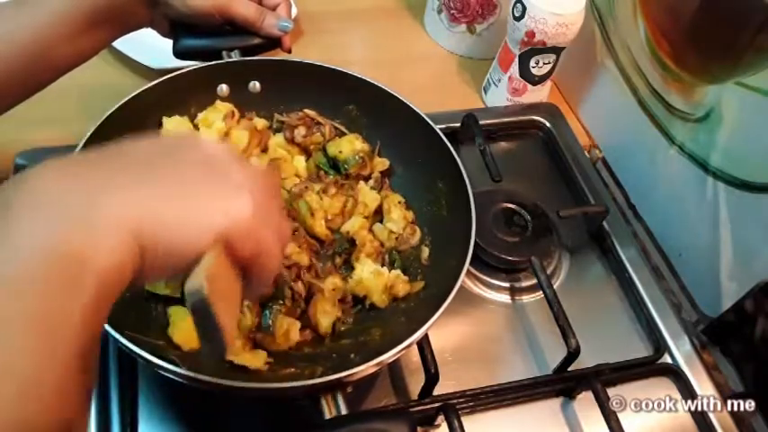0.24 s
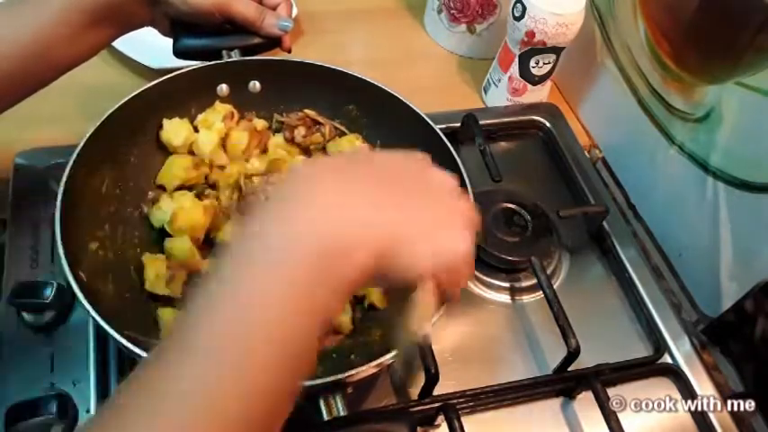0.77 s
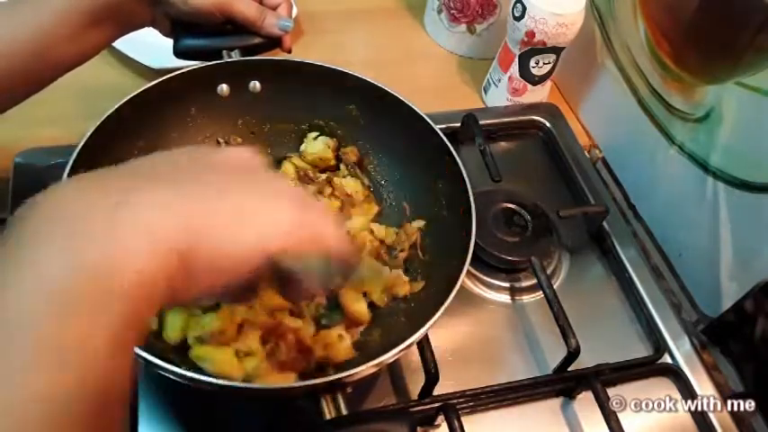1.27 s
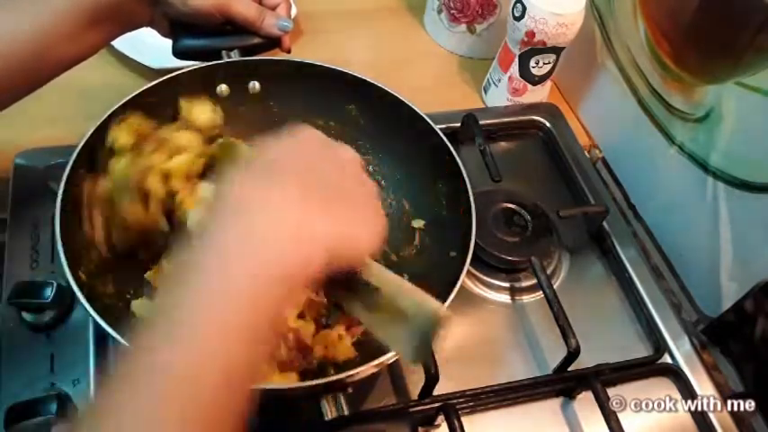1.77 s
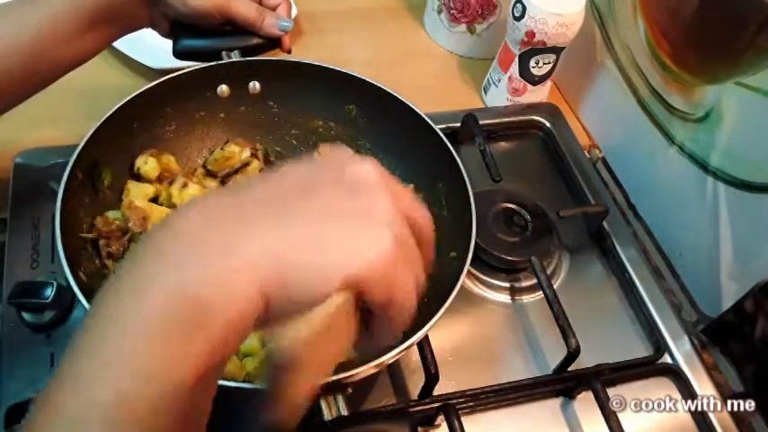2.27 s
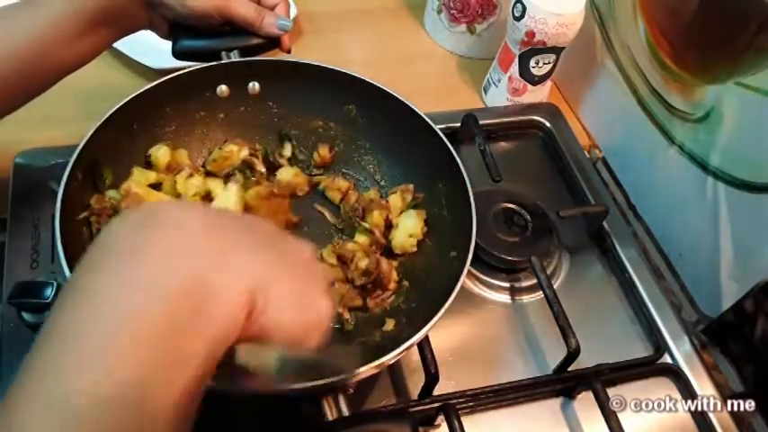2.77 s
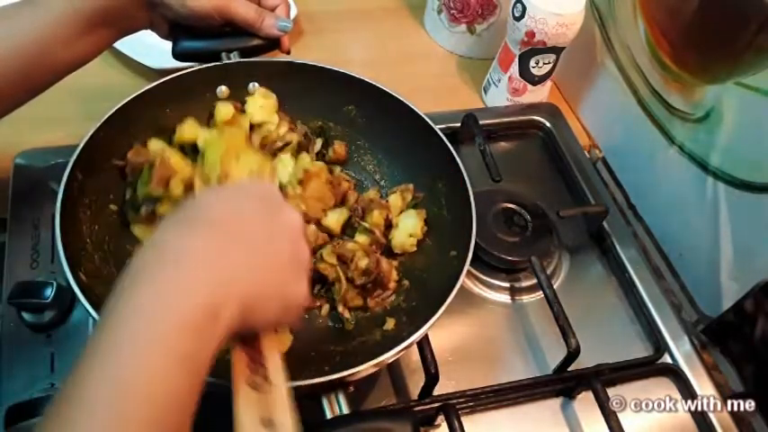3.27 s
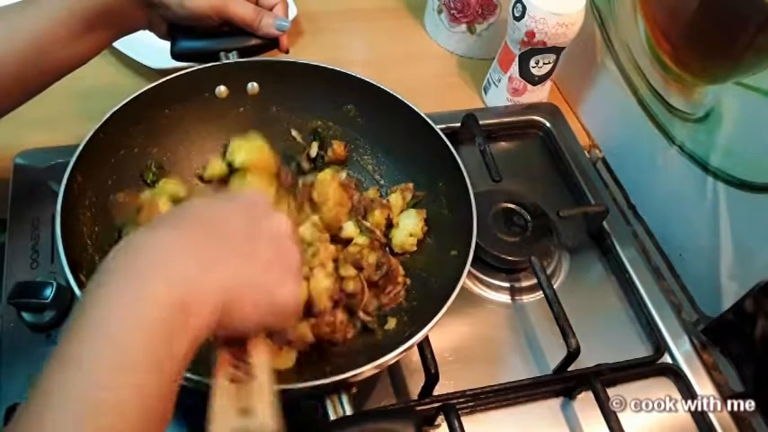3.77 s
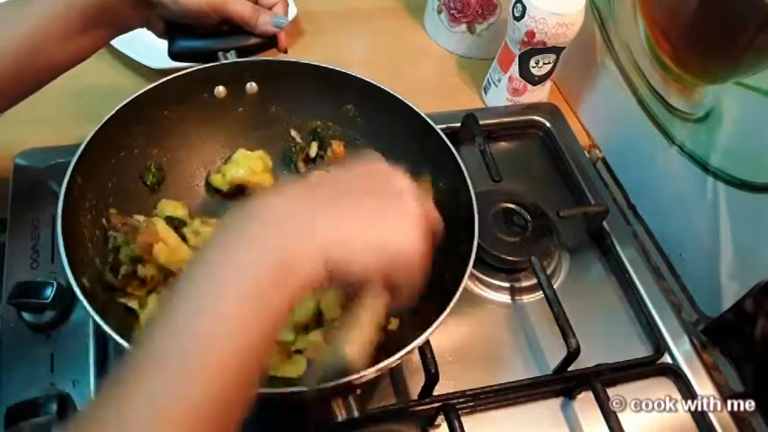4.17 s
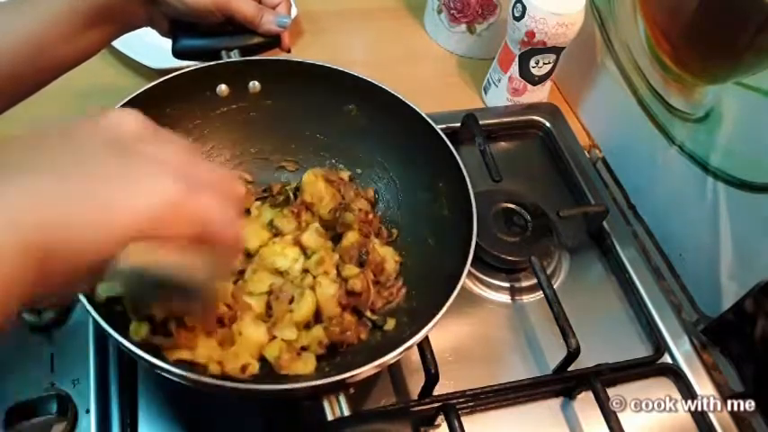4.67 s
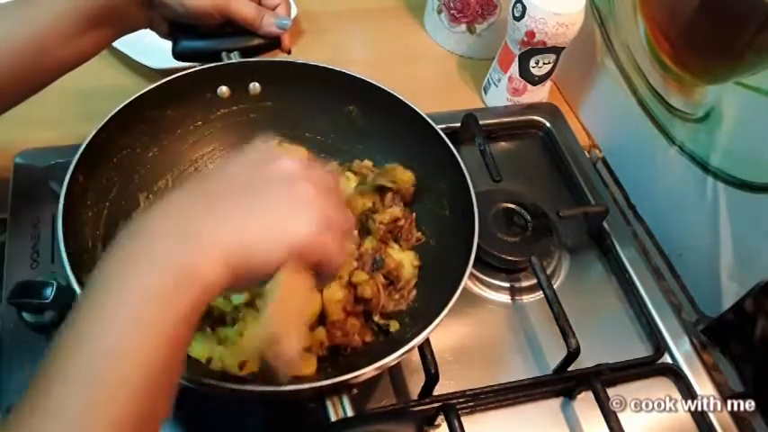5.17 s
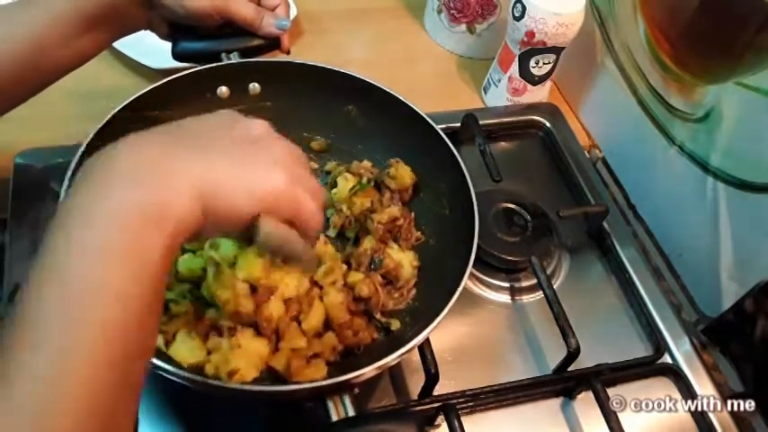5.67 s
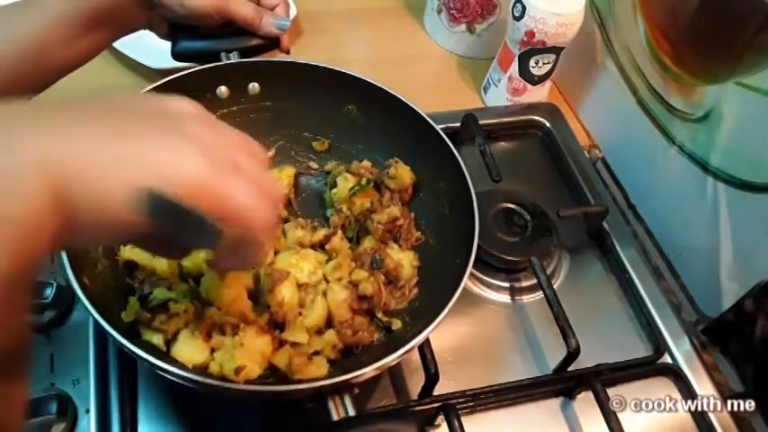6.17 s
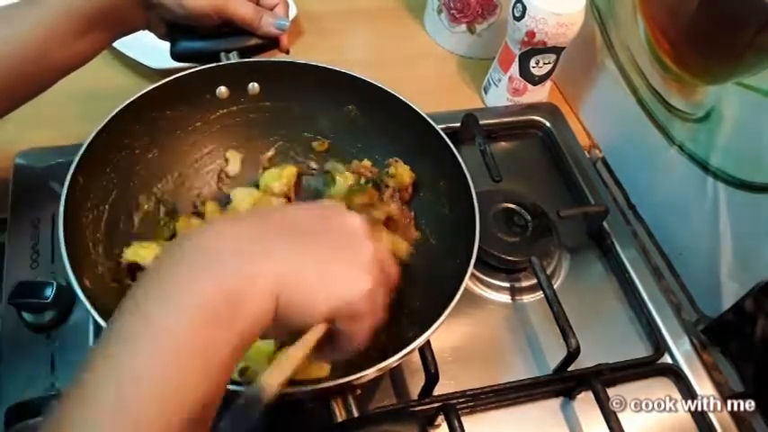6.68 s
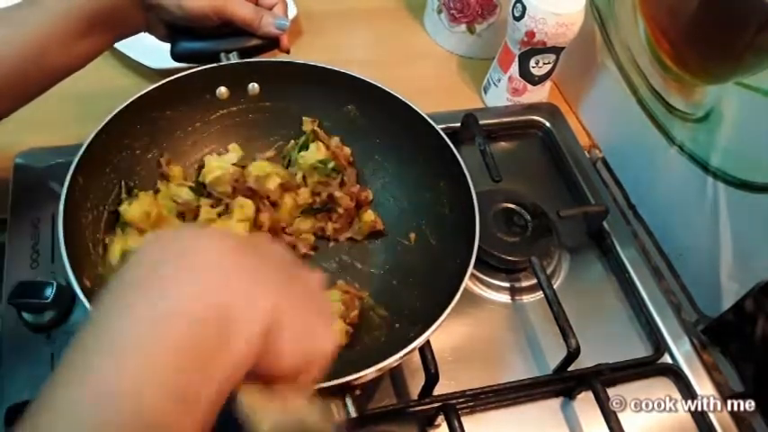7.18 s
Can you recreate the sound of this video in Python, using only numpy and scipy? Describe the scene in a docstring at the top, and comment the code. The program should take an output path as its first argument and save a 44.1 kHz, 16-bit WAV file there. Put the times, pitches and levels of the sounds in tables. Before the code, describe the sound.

Close above a pan in a small kitchen, a bright frying sizzle with sharp little spits runs over the faint rumble of a gas ring. A wooden spatula rasps through the moist food, busiest at first, each stroke raising a wet hiss. It knocks now and then on the pan's base and rim, hardest late on with a short metallic ring. The sizzle sinks for a moment, then swells with more scraping.

```python
"""Oil sizzles and spits, heard from just above a non-stick pan of potato and onion in a small kitchen.
Steam bubbles and drops of water burst in the oil, and the sizzle flares as moist food is turned.
A wooden spatula scrapes through it, sticking and slipping, knocks dully on the pan's base and clacks
against its rim. Underneath runs the low rumble of the gas stove."""
import sys
import numpy as np
from scipy import signal
from scipy.fft import rfft, irfft
from scipy.io import wavfile

SR = 44100
rng = np.random.default_rng(int(sys.argv[2]) if len(sys.argv) > 2 else 0)


def transcribe(signal):
    """Save signal, clipped to [-1, 1], as a 16-bit WAV file at the path in sys.argv[1]."""
    frames = np.atleast_2d(signal).T
    limited = np.clip(frames, -1, 1)
    pcm = np.round(limited * 32767).astype(np.int16)
    wavfile.write(sys.argv[1], SR, pcm)


N = 328104
TIME = np.arange(N) / SR
BLOW_TIME = TIME[:SR * 3 // 4]   # long enough for a knock to die away


def from_db(db):
    """Decibels to gain."""
    return 10 ** (np.asarray(db) / 20)


def unit_rms(x):
    """Scale to unit rms."""
    return x / np.sqrt(np.mean(x ** 2) + 1e-20)


def unit_attack(x):
    """Scale a blow to unit rms over its first 20 ms."""
    return x / np.sqrt(np.mean(x[:SR // 50] ** 2) + 1e-20)


def over_time(points):
    """Join (time_s, value) points into a curve across the scene."""
    return np.interp(TIME, *np.transpose(points))


def at_hz(points, hz):
    """Read (freq_hz, value) points on a log-frequency axis."""
    freq_hz, value = np.transpose(points)
    return np.interp(np.log(hz + 1), np.log(freq_hz), value)


def add(out, start_s, sound):
    """Mix a sound in from start_s."""
    start = max(round(start_s * SR), 0)
    out[start:start + len(sound)] += sound[:N - start]


def drift(per_s, size=N):
    """A random wander of unit rms that turns per_s times a second."""
    knots = rng.standard_normal(4000)
    return unit_rms(np.interp(TIME[:size] * per_s, np.arange(len(knots)), knots))


def coloured(x, spectrum, size=4096):
    """Causal (minimum-phase) filter with the given spectrum."""
    bin_hz = np.arange(size // 2 + 1) * SR / size
    cepstrum = irfft(np.log(from_db(at_hz(spectrum, bin_hz))))
    cepstrum[1:size // 2] *= 2
    cepstrum[size // 2 + 1:] = 0
    impulse = irfft(np.exp(rfft(cepstrum)))[:size // 2]
    return signal.fftconvolve(x, impulse)[:len(x)]


def resonance(x, hz, width_hz, block=64):
    """A band-pass whose centre follows hz, block by block."""
    radius = np.exp(-np.pi * width_hz / SR)
    out, state = np.zeros(len(x)), np.zeros(2)
    for i in range(0, len(x), block):
        poles = [1, -2 * radius * np.cos(2 * np.pi * hz[i] / SR), radius * radius]
        out[i:i + block], state = signal.lfilter([1, 0, -1], poles, x[i:i + block], zi=state)
    return out


def grains(per_s, spread_db, size=N):
    """Random clicks, many small and a few large."""
    heights = from_db(spread_db * np.minimum(rng.exponential(1, size), 5))
    return heights * rng.choice([-1, 1], size) * (rng.random(size) < per_s / SR)


def ring(modes):
    """Decaying modes; each blow deals them slightly different strengths."""
    hz, db, t60_s = np.transpose(modes)[:, :, None]
    strength = from_db(db + rng.standard_normal(hz.shape)) * rng.choice([-1, 1], hz.shape)
    partials = strength * from_db(-60 * BLOW_TIME / t60_s) * np.sin(2 * np.pi * hz * BLOW_TIME)
    return unit_attack(np.sum(partials, axis=0))


def crack(spectrum, t60_s, snap_db=0.0, snap_t60_s=0.0169):
    """A sharp snap and brief chatter, coloured by the spectrum."""
    envelope = from_db(-60 * BLOW_TIME / t60_s) + from_db(snap_db - 60 * BLOW_TIME / snap_t60_s)
    chatter = rng.choice([-1., 1.], len(BLOW_TIME)) * envelope
    return unit_attack(coloured(chatter, spectrum))


def hollow(x, hz, width_hz):
    """One broad, damped note drawn from a crack, such as that of a spatula held in the hand."""
    return unit_attack(resonance(x, np.full(len(x), hz), width_hz, block=len(x)))


# Decay of the small kitchen: freq_hz, t60_s
KITCHEN_DECAY = [(100, 0.66), (500, 0.372), (2000, 0.3914), (8000, 0.416), (16000, 0.261)]


def kitchen(x, wet_db):
    """Direct sound at the microphone plus dense reflections from worktop and walls, dying band by band."""
    edges_hz = np.geomspace(60, 17000, 9)
    tail = 0
    for low, high in zip(edges_hz, edges_hz[1:]):
        band_pass = signal.butter(2, [low, high], "band", fs=SR, output="sos")
        band = signal.sosfilt(band_pass, rng.standard_normal(len(BLOW_TIME)))
        tail += band * from_db(-60 * BLOW_TIME / at_hz(KITCHEN_DECAY, np.sqrt(low * high)))
    tail *= np.clip(BLOW_TIME / 0.00093 - .5, 0, 1)   # reflections arrive just after the direct sound
    return x + from_db(wet_db) * signal.fftconvolve(x, tail / np.linalg.norm(tail))[:N]


# Level of the low rumble as heard, dipping after the loudest knock and then recovering: time_s, level_db
RUMBLE_LEVEL = [(0.0, -53), (0.16, -58.5), (1.66, -55.5), (2.65, -57), (3.52, -55.5), (3.94, -57),
                (5.62, -56), (5.84, -55.5), (6.34, -67), (7.0, -58.5), (7.17, -55.5), (7.44, -55)]
# Colour of the rumble: freq_hz, relative_db
RUMBLE_SPECTRUM = [(20, -17.5), (35, -17), (48, -19), (60, 5.5), (76, -15.5), (100, 1.5), (135, -0.5),
                   (165, -10.5), (200, -7.5), (250, -12.5), (330, -2.5), (470, -18), (800, -15.5),
                   (2000, -26)]


def stove(drone_hz=57.05):
    """The gas ring, in the background: a low, slightly fluttering rumble with a wavering drone in it."""
    noise = unit_rms(coloured(rng.standard_normal(N), RUMBLE_SPECTRUM))
    rumble = from_db(1.5 + 0.44 * drift(per_s=13)) * noise
    drone = from_db(-9.5 + 2.0 * drift(per_s=3)) * np.sin(2 * np.pi * drone_hz * TIME)
    return from_db(over_time(RUMBLE_LEVEL)) * (rumble + drone)


def pressure_db(t, rise_s, fall_s, roundness=1.924):
    """A stroke presses hardest at t = 0 and is 10 dB lighter rise_s before and fall_s after."""
    return -10 * np.maximum(-t / rise_s, t / fall_s) ** roundness


def flares(linger_db=-7, settle_db_per_s=78.5):
    """Each spatula stroke turns moist food onto hot metal: sizzle and wet hiss swell, then settle."""
    sizzle_power, wet_power = np.zeros(N), np.zeros(N)
    for peak_s, rise_s, fall_s, *_, flare_db, wet_hiss_db in SPATULA_STROKES:
        t = np.arange(max(-3 * rise_s, -peak_s), 1, 1 / SR)
        press_db = pressure_db(t, rise_s, fall_s)
        swell_db = np.where(t < 0, press_db, np.maximum(press_db, linger_db - settle_db_per_s * t))
        add(sizzle_power, peak_s + t[0], from_db(flare_db + swell_db) ** 2)
        add(wet_power, peak_s + t[0], from_db(wet_hiss_db + swell_db) ** 2)
    return sizzle_power, wet_power


# Level of the steady frying as heard, dipping after the loudest knock and then recovering:
# time_s, level_db
FRYING_LEVEL = [(0, -40), (0.27, -41.5), (0.68, -41.5), (1.33, -42), (1.87, -42.5), (2.53, -41.0),
                (3.12, -43.5), (3.48, -42), (3.95, -40), (4.56, -40.5), (5.08, -42.5), (5.85, -44),
                (6.2, -48.5), (6.5, -52.0), (6.76, -45.5), (6.95, -46), (7.24, -40.5), (7.42, -44)]
# Colours of the bright sizzle and of the wet hiss, close up: freq_hz, relative_db
SIZZLE_SPECTRUM = [(1500, -49.5), (3000, -29), (5000, -18.5), (6500, -11.5), (7400, -8.5), (8100, -2),
                   (8700, 2), (9300, -3.5), (10000, -9), (11500, -14.5), (13500, -19), (16000, -24.5)]
WET_SPECTRUM = [(300, -13.5), (600, -9.5), (1200, -6.5), (2000, 1), (3000, 1.5), (4000, 1.5), (5500, -1),
                (8000, 0), (14000, -21.5)]


def frying(flare_top_hz=10200):
    """Tiny steam bubbles burst in the oil; turned food adds a muffled flare and a lower, wetter crackle."""
    level_db = over_time(FRYING_LEVEL)
    flare_power, wet_power = flares()
    bubbles = grains(per_s=6000 * from_db(2.3 * drift(per_s=40)), spread_db=2.0)
    sizzle = from_db(level_db - 0.5) * unit_rms(coloured(bubbles, SIZZLE_SPECTRUM))
    muffle = signal.butter(2, flare_top_hz, fs=SR, output="sos")   # food lying on the oil
    flare_bubbles = coloured(grains(per_s=6000, spread_db=2.5), SIZZLE_SPECTRUM)
    flare = np.sqrt(flare_power) * unit_rms(signal.sosfilt(muffle, flare_bubbles))
    wet_bubbles = coloured(grains(per_s=10000, spread_db=2.5), WET_SPECTRUM)
    wet_hiss = np.sqrt(from_db(level_db - 9.5) ** 2 + wet_power) * unit_rms(wet_bubbles)
    return sizzle + flare + wet_hiss


# The loudest spits from the pan: start_s, tick_db, pop_hz, pop_db
LOUD_SPITS = [(1.6475, -41, 4500, -59), (2.593, -44.5, 4530, -65), (3.054, -45, 2320, -55),
              (4.9035, -38.5, 5500, -52.5), (7.2155, -45, 4220, -48)]
# Colour of their tick: freq_hz, relative_db
SPIT_SPECTRUM = [(700, -39), (2200, -26), (3500, -20), (5500, 5.5), (7000, -4.5), (8700, 17), (10500, -4),
                 (16000, -35.5)]


def spitting():
    """Drops of water burst in the oil: dry, sharp ticks at random and a few loud ones with a short pop."""
    ticks = unit_rms(coloured(grains(per_s=22, spread_db=2.0), SIZZLE_SPECTRUM))
    stray = from_db(over_time(FRYING_LEVEL) - 11.5) * ticks
    loud = np.zeros(N)
    for start_s, tick_db, pop_hz, pop_db in LOUD_SPITS:
        tick = crack(SPIT_SPECTRUM, t60_s=0.012, snap_t60_s=0.0044)
        pop = hollow(crack(WET_SPECTRUM, t60_s=0.012), pop_hz, width_hz=660)
        add(loud, start_s, from_db(tick_db) * tick + from_db(pop_db) * pop)
    return stray + kitchen(loud, wet_db=-1)


# Ringing of the pan's base, and the pan rocking on the grate: pitch_hz, relative_db, t60_s
BASE_RING = [(569.5, -8.5, 0.32), (609.5, -8.5, 0.338), (791.6, -7, 0.26), (865, 3.5, 0.23),
             (975.1, 9, 0.22), (1124, -15, 0.22), (1147, -2.5, 0.484), (1187, -11.5, 0.27),
             (1223, -4, 0.55), (1356, -21, .2), (1590, -15.5, 0.27), (1705, -21.5, 0.18), (1840, -10, 0.24),
             (1960, -7.5, 0.18), (2235, -1.5, 0.19), (2352, -14, 0.37), (2350, -6, 0.28), (3030, -3, 0.21),
             (3170, -8, 0.28)]
GRATE_THUMP = [(58.54, -12.5, 0.56), (106.5, -5.5, 0.49), (165.24, 4, 0.563), (197.6, 7, 0.296),
               (216.1, -1.5, 0.498), (267.7, 5.5, 0.258), (374.9, -5, 0.218)]
# Colours of dull wood and of its clack on the base: freq_hz, relative_db
DULL_WOOD_SPECTRUM = [(60, -3), (180, -8.5), (380, -2), (560, 1), (680, -13), (830, 7), (980, 1.5),
                      (1100, -1.5), (1260, 1), (1450, -22.5), (3000, -13), (12000, -71.5)]
CLACK_SPECTRUM = [(800, -2.5), (1400, -5.5), (1750, 4), (2000, -4), (2380, 2.5), (2700, -5.5), (3100, -6.5),
                  (4200, -15), (6000, -15.5), (7200, -21.5), (8500, -12), (12000, -35)]
# Blows down in the pan: start_s, wood_db, note_hz, thump_db, clack_db, ring_db
BASE_BLOWS = [(0.753, -57.5, 566, -43.5, -46, -68), (1.412, -45.5, 646, -47, -42.5, -66.5),
              (1.992, -35, 578, -47.5, -34, -62.5), (3.667, -46, 420, -54, -58, -80.5),
              (5.585, -32.5, 603, -51, -35.5, -55), (5.952, -22.5, 1213, -43.5, -24, -25),
              (6.282, -30.5, 1043, -48, -28, -37.5)]


def base_knocks():
    """The blade chops through potato onto the base: hollow wood, a short ring and a thump on the grate."""
    wood, metal = np.zeros(N), np.zeros(N)
    for start_s, wood_db, note_hz, thump_db, clack_db, ring_db in BASE_BLOWS:
        contact = crack(DULL_WOOD_SPECTRUM, t60_s=0.0653)
        body = from_db(-10) * contact + hollow(contact, note_hz, width_hz=172)
        clack = crack(CLACK_SPECTRUM, t60_s=0.0527)
        add(wood, start_s, from_db(wood_db) * body + from_db(clack_db) * clack)
        add(metal, start_s, from_db(ring_db) * ring(BASE_RING))
        add(metal, start_s, from_db(thump_db) * ring(GRATE_THUMP))
    return kitchen(wood, wet_db=-3.5) + metal


# Ringing of the pan's rim: pitch_hz, relative_db, t60_s
RIM_RING = [(750, -21, 0.16), (985, -3.5, 0.449), (1143, 5, 0.16), (1484.6, 2, 0.226), (1975, 7, 0.174),
            (2780, -4.5, 0.51), (3320, -23, .4), (4065, 5, 0.153), (4700, -2, 0.28), (7136, -7, 0.34),
            (8474, -6.5, 0.37), (8565, -27, 0.18)]
# Colours of hard wood and of its bright tick on the rim: freq_hz, relative_db
HARD_WOOD_SPECTRUM = [(200, -13), (450, 3.5), (800, -5), (1000, -9.5), (1400, -2.5), (1900, 4), (2600, 4.5),
                      (3200, 0.5), (4200, 1), (6000, -4), (12000, -59.5)]
TICK_SPECTRUM = [(2500, -27.5), (5000, -12.5), (6500, -3.5), (8000, 2.5), (8700, 4), (9500, 0),
                 (10800, -16), (13000, -23.5), (16000, -30)]
# Blows up on the rim: start_s, wood_db, note_hz, thump_db, tick_db, ring_db
RIM_BLOWS = [(2.309, -33, 1185, -43.5, -27.5, -30.5), (2.661, -32.5, 810.5, -48.5, -32.5, -37.5),
             (4.029, -35, 873.7, -49, -24.5, -44.5), (6.576, -33.5, 771.6, -48.5, -32, -43.5),
             (7.0, -32.5, 771, -47.5, -25, -32.5)]


def rim_knocks():
    """Bare wood meets the rim: a hard, bright clack, and the pan's wall rings like a damped bell."""
    wood, metal = np.zeros(N), np.zeros(N)
    for start_s, wood_db, note_hz, thump_db, tick_db, ring_db in RIM_BLOWS:
        contact = crack(HARD_WOOD_SPECTRUM, t60_s=0.0375)
        body = contact + from_db(-9) * hollow(contact, note_hz, width_hz=49)
        tick = crack(TICK_SPECTRUM, t60_s=0.0347, snap_db=-1, snap_t60_s=0.021)
        add(wood, start_s, from_db(wood_db) * body + from_db(tick_db) * tick)
        add(metal, start_s, from_db(ring_db) * ring(RIM_RING))
        add(metal, start_s, from_db(thump_db) * ring(GRATE_THUMP))
    return kitchen(wood, wet_db=-0.5) + metal


# Colours of the blade's rasping edge and of its dragging flat: freq_hz, relative_db
RASP_SPECTRUM = [(150, -22), (500, -30.5), (680, -12.5), (820, 2), (1150, 2.5), (1450, -1), (2000, 4.5),
                 (2500, -2), (3100, -2.5), (5000, -10), (11000, -25.5)]
DRAG_SPECTRUM = [(120, -17), (300, -15.5), (450, -9.5), (570, 0), (680, -12.5), (800, 3), (1000, -14.5),
                 (1600, -16.5), (4000, -64)]
# Strokes through the food, close below the microphone:
# peak_s, rise_s, fall_s, edge_db, blade_hz, width_hz, flat_db, flare_db, wet_hiss_db
SPATULA_STROKES = [ (0.072, 0.0378, 0.0242, -33, 1122, 320, -60.5, -41, -43.5),
                   (0.441, .021, 0.0192, -26, 1087, 320, -53, -39, -48),
                   (0.473, 0.02285, 0.0305, -29.5, 1134, 700, -55, -35.5, -48.5),
                   (0.782, 0.0242, 0.103, -42.5, 1885, 440, -58, -35, -45.5),
                   (0.967, 0.0266, 0.0192, -35.5, 1193, 110, -46.5, -26, -40.5),
                   (1.04, 0.0317, 0.0377, -41.5, 1070, 400, -42.5, -35, -58.5),
                   (1.102, 0.0337, 0.0193, -38, 1040, 500, -40.5, -34.5, -44.5),
                   (1.46, 0.0298, 0.049, -53, 1740, 440, -54.5, -35, -44),
                   (1.496, 0.0143, 0.0325, -31, 1715, 130, -52.5, -35.5, -40.5),
                   (1.555, 0.0393, 0.0285, -39, 1647, 250, -49, -39.5, -41),
                   (2.051, .024, 0.0276, -31, 1430, 1000, -48.5, -33.5, -33.5),
                   (2.355, 0.0135, 0.0393, -40, 1790, 600, -42.5, -38.5, -38.5),
                   (2.715, 0.0165, 0.0515, -59.5, 1800, 600, -67, -31.5, -36),
                   (2.815, 0.0207, 0.041, -48.5, 1550, 600, -58, -39, -45.5),
                   (3.29, 0.086, 0.178, -52.5, 2190, 1200, -72.5, -41, -49),
                   (4.145, 0.0225, 0.031, -45.5, 1560, 700, -56.5, -58, -54.5),
                   (4.234, 0.037, 0.0456, -42.5, 2090, 1000, -54, -49, -59),
                   (4.315, 0.0557, 0.0417, -40, 1070, 447, -45, -37, -56.5),
                   (4.405, 0.024, 0.0316, -45, 1200, 800, -42.5, -41, -43.5),
                   (4.447, 0.0176, 0.0204, -43, 1627, 440, -53.5, -43.5, -42.5),
                   (4.836, .022, 0.025, -39.5, 1230, 513, -44, -42.5, -37.5),
                   (5.22, 0.076, 0.094, -59.5, 2100, 500, -65, -48.5, -47.5),
                   (5.27, 0.0338, 0.0157, -46.5, 1200, 800, -52.5, -43.5, -47),
                   (5.684, 0.0205, 0.0105, -42, 1100, 700, -59.5, -53.5, -56.5),
                   (6.66, 0.0291, 0.064, -50, 1530, 600, -53.5, -47, -48),
                   (7.09, 0.0224, 0.066, -43.5, 1644, 900, -53, -44.5, -50),
                   (7.168, 0.042, 0.0666, -46.5, 1720, 800, -56, -44.5, -45.5), ]


def scraping(stiffening=0.0264):
    """The edge sticks and slips, its note rising with pressure; the flat drags lower; the base rings."""
    scrapes = np.zeros(N)
    for peak_s, rise_s, fall_s, edge_db, blade_hz, width_hz, flat_db, *_ in SPATULA_STROKES:
        t = np.arange(max(-3 * rise_s, -peak_s), 3 * fall_s, 1 / SR)
        press = from_db(pressure_db(t, rise_s, fall_s))
        judder = from_db(1.64 * drift(per_s=213.4, size=len(t)))   # the wood catches on crumbs
        slips = judder * grains(per_s=3200, spread_db=2.29, size=len(t))
        rasp = coloured(slips, RASP_SPECTRUM)
        blade = resonance(rasp, blade_hz * (1 + stiffening * (press - 1)), width_hz)
        edge = unit_rms(unit_rms(blade) + from_db(-16.5) * unit_rms(rasp))
        flat = unit_rms(coloured(slips, DRAG_SPECTRUM))
        add(scrapes, peak_s + t[0], press * (from_db(edge_db) * edge + from_db(flat_db) * flat))
    base = ring(BASE_RING)
    ringing = signal.fftconvolve(scrapes, base / np.linalg.norm(base))[:N]
    return kitchen(scrapes + from_db(-25) * ringing, wet_db=-6.5)


def scene():
    """Everything at one microphone above the pan."""
    return (frying() + spitting() + scraping() + base_knocks() + rim_knocks() + stove())[None]


def record(dry, bass_hz=42, top_hz=15900):
    """The small microphone loses the deepest bass; peaks are rounded and the top is cut."""
    thin = signal.sosfilt(signal.butter(3, bass_hz, "high", fs=SR, output="sos"), dry)
    rounded = .5 * np.tanh(thin / .5)
    return signal.sosfilt(signal.ellip(12, .1, 80, top_hz, fs=SR, output="sos"), rounded)


dry = scene()
out = record(dry)
transcribe(out)
```